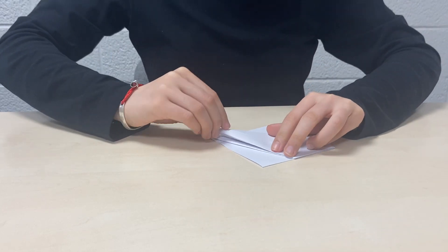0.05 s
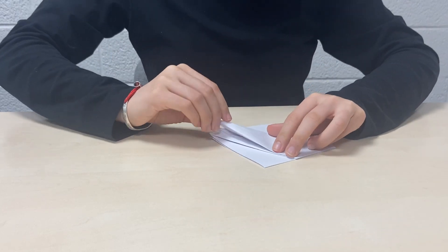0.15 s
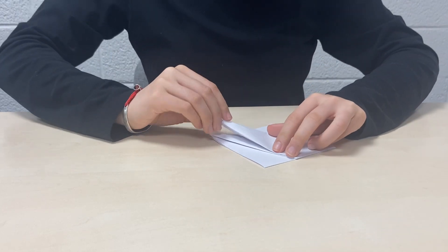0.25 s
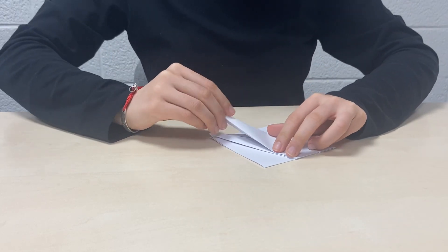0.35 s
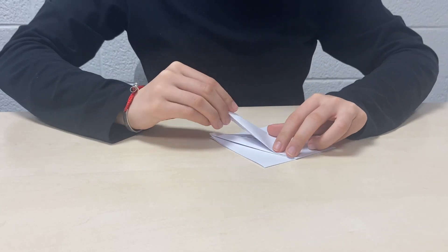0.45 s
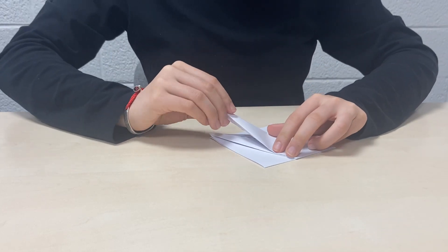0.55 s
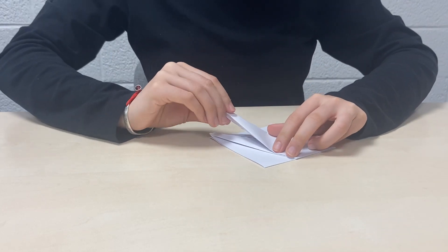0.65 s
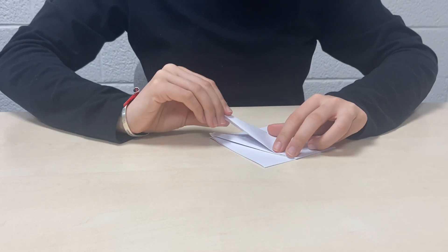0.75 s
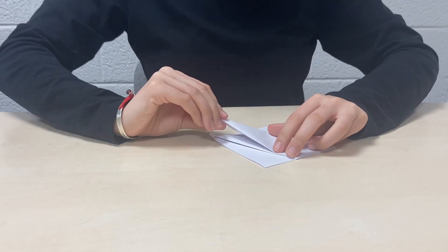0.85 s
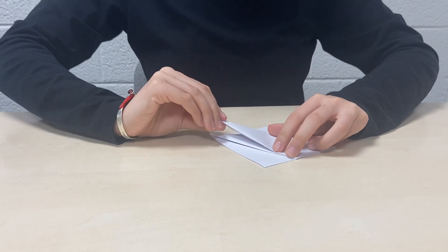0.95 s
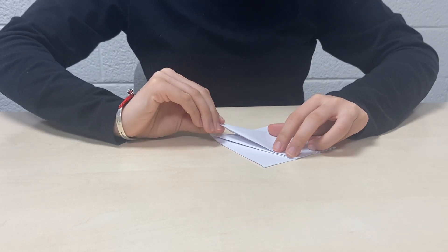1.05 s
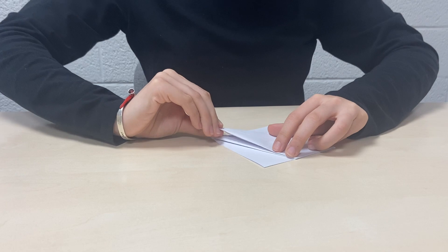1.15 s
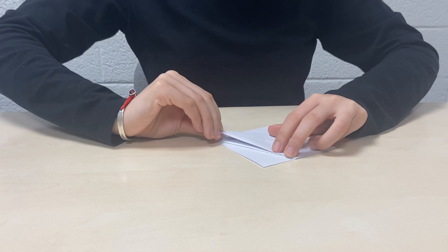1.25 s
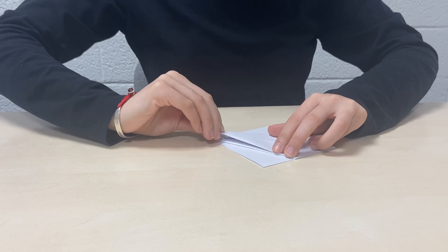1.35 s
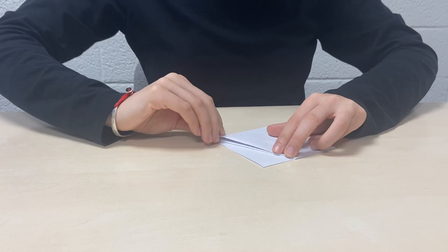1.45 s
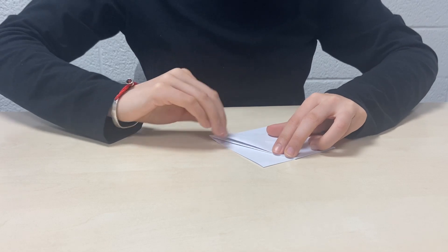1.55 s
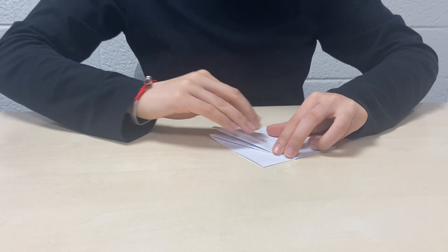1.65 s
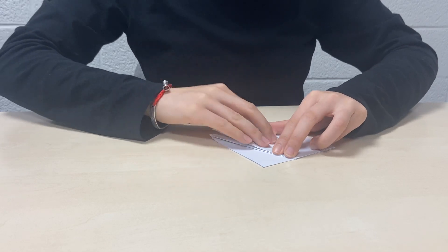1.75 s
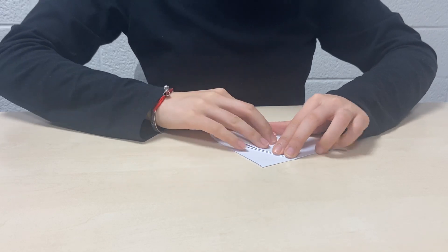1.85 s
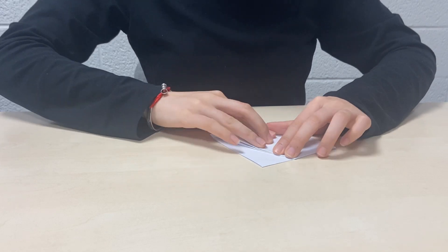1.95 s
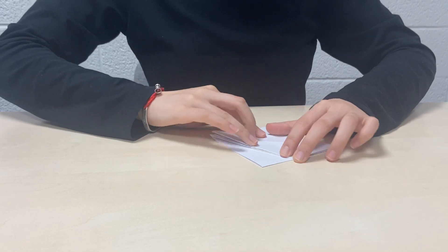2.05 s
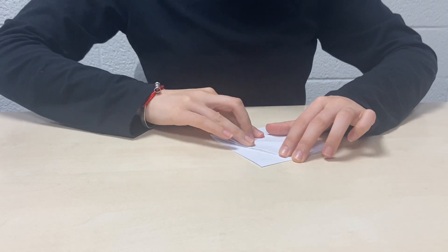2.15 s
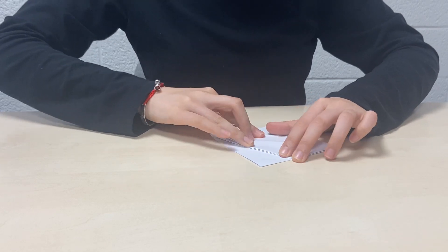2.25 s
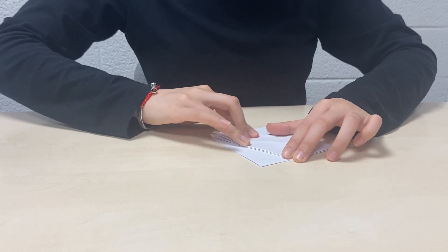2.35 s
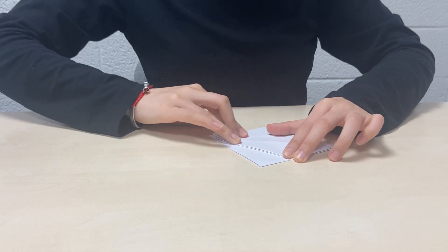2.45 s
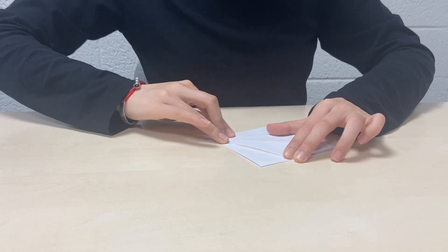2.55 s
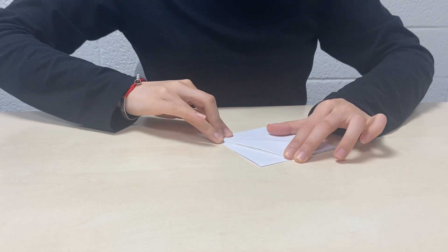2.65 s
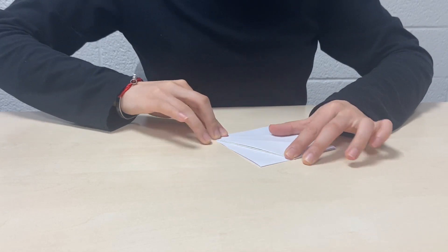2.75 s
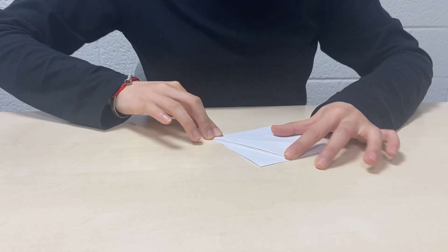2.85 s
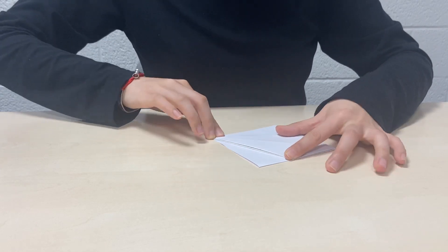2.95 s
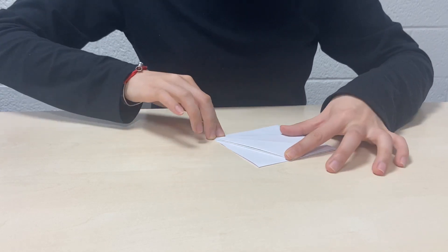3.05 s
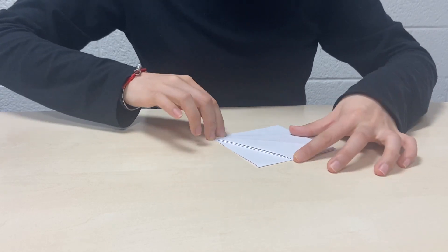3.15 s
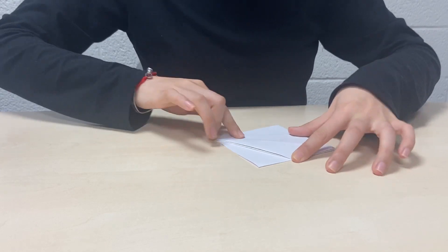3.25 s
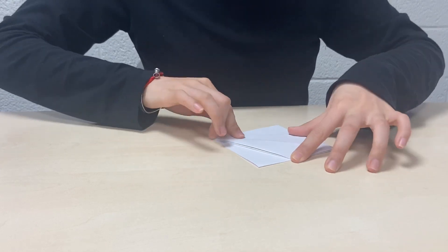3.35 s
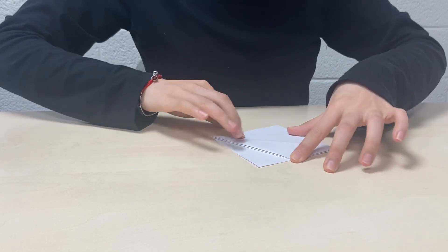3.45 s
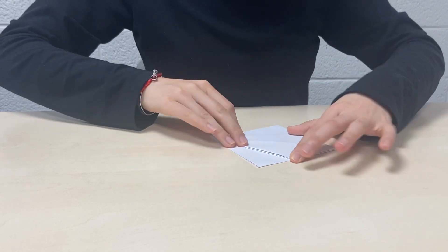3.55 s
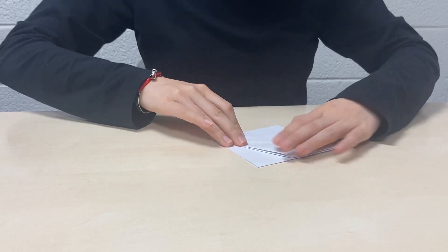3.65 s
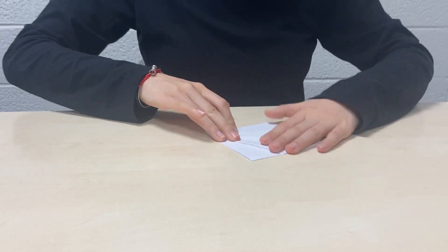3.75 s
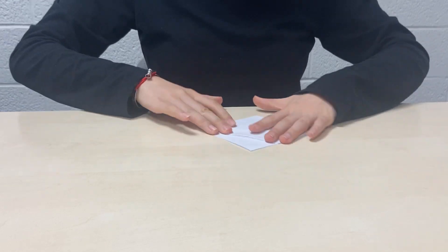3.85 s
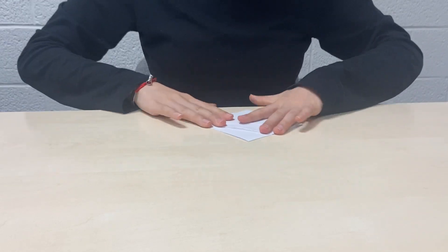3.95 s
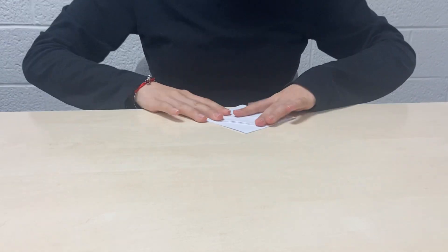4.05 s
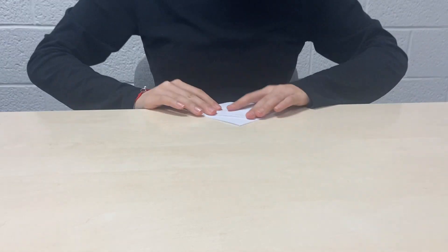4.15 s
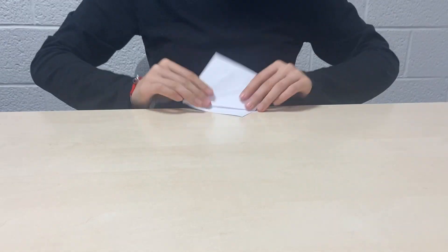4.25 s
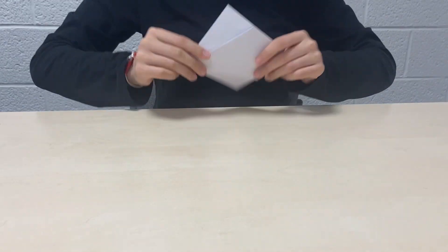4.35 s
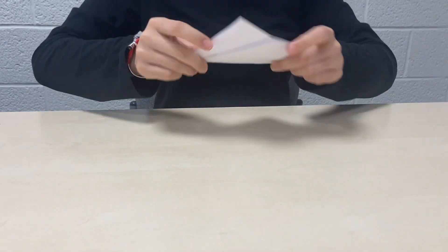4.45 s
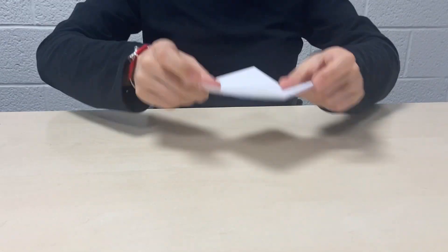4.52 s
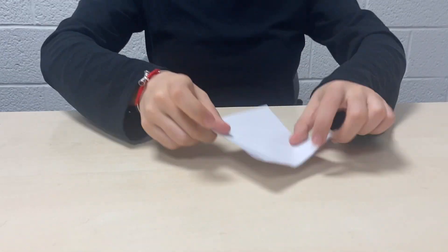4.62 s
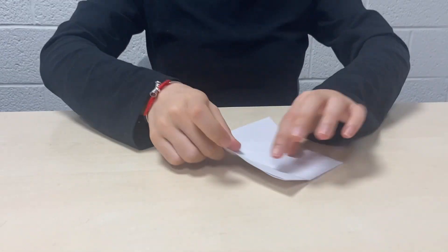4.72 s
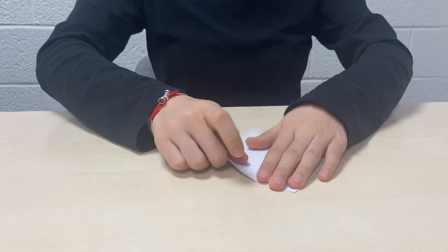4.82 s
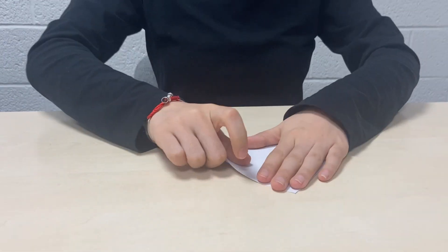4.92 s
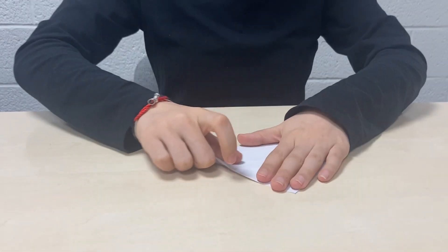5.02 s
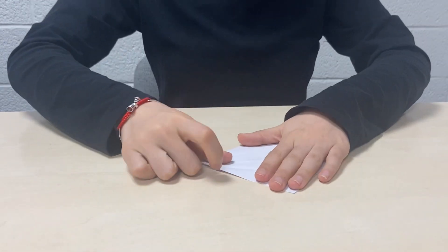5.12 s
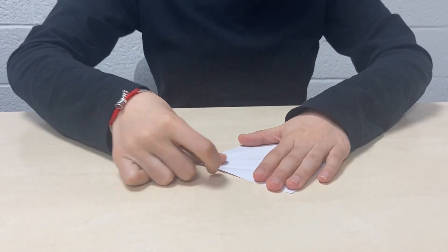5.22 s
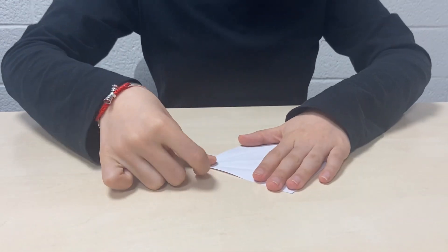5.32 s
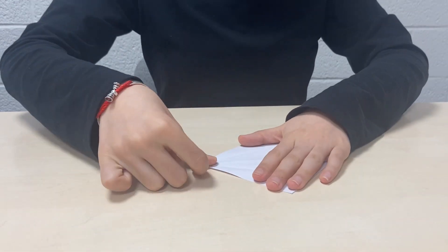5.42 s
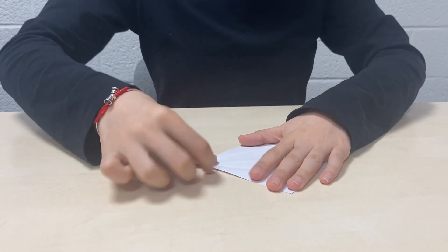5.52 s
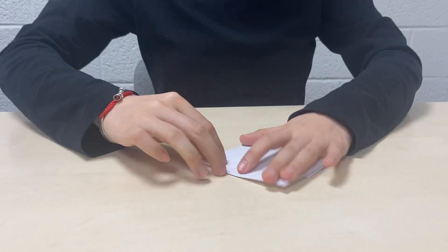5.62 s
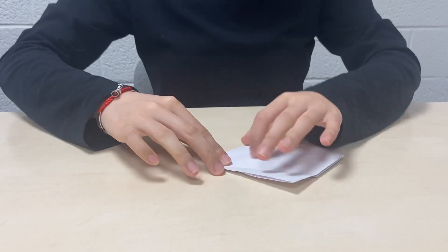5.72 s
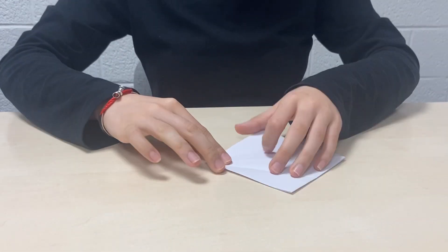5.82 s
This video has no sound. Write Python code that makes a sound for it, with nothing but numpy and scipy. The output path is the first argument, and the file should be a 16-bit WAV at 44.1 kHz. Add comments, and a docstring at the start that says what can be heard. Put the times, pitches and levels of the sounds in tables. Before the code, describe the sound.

Paper is folded by hand on a wooden table in a small bare room, heard close in stereo. A crisp tick opens the sound, another follows at 0.3 seconds, then lighter papery flicks at 0.8 and 1.3. Between 1.6 and 2.2 fingertips rub and press the crease with hissy strokes and tiny crackles. A tight cluster of snaps rings out at 2.4 to 2.5, then quieter scrapes and soft taps, with brief sharp rubs near 3.5. From 3.7 to 4.7 the sheet slides with a sustained papery hiss and is lifted, with a dull hand thud at 4.0 and fluttering crackles around 4.35. At 4.73 comes the loudest, brightest snap as it is turned over, followed by rustling and a wooden bump at 4.9. Rubbing continues, with crisp clicks at 5.14 and 5.7. Faint low ventilation rumbles throughout, and the snaps get a short room reflection.

```python
"""Paper handled on a wooden table

A folded sheet is creased, slid and turned over by hand in a small bare room, close to a two-port recorder.
Creases snap as noise bursts that ring; skin and paper are random grains through bands and resonances.
Wrists thud on the table as soft blows to its modes, the room answers the snaps with decaying noise,
and ventilation rumbles below as coloured noise."""
import sys
import numpy as np
from scipy import signal
from scipy.fft import rfft, irfft, next_fast_len
from scipy.io import wavfile

SR = 44100
rng = np.random.default_rng(int(sys.argv[2]) if len(sys.argv) > 2 else 0)


def wrap_up_sound(samples):
    """Save the sound to the file named by the first command line argument, as 16-bit audio."""
    columns = np.atleast_2d(samples).T
    # keep every value between -1 and 1, then stretch to whole-number steps
    tamed = np.clip(columns, -1, 1)
    steps = np.round(tamed * 32767).astype(np.int16)
    wavfile.write(sys.argv[1], SR, steps)


N = 259300   # length in samples

EDGES = 25 * 2 ** np.arange(0, 9.6, .5)   # half-octave band edges in Hz


def from_db(db):
    """Decibels to gain."""
    return 10 ** (np.asarray(db) / 20)


def rms_one(x):
    """Scale to rms 1."""
    return x / np.sqrt(np.mean(x ** 2) + 1e-20)


def in_time(rows):
    """Columns of a curve table, drawn as straight lines with one value a sample."""
    s, *columns = np.transpose(rows)
    return [np.interp(np.arange(N) / SR, s, column) for column in columns]


def at_hz(points, hz, order=1):
    """Read a column of a spectrum table on a log-frequency axis."""
    points = np.array(points)
    return np.interp(np.log(hz), np.log(points[:, 0]), points[:, order])


def drift(rate_hz):
    """Slow random curve of rms 1: noise through two equal low-pass poles at rate_hz."""
    step, settle = 40, 2000   # samples per coarse point, coarse points dropped while the filter settles
    r = np.exp(-2 * np.pi * step * rate_hz / SR)
    noise = rng.standard_normal(N // step + settle + 2)
    slow = signal.lfilter([1], [1, -2 * r, r * r], noise)[settle:]
    return np.interp(np.arange(N) / step, np.arange(len(slow)), rms_one(slow))


def band(x, low_hz, high_hz):
    """Band-pass."""
    return signal.sosfilt(signal.butter(2, [low_hz, high_hz], "band", fs=SR, output="sos"), x)


def resonance(x, hz, width_hz):
    """Two-pole resonance, gain 1 on top."""
    r = np.exp(-np.pi * width_hz / SR)
    poles = [1, -2 * r * np.cos(2 * np.pi * hz / SR), r * r]
    return signal.lfilter([(1 - r * r) / 2, 0, (r * r - 1) / 2], poles, x)


def stereo(mid, side, hz):
    """Blend two independent signals into a left and right that are as alike as that pitch calls for."""
    # Left-right likeness ahead of the recorder. Each row: frequency in Hz, correlation (1 = identical).
    likeness = [(60, 0.99), (120, 0.95), (250, 0.74), (500, 0.045), (900, 0.03), (1500, 0.05), (2500, 0.59),
                (5000, 0.26)]
    alike = np.clip(at_hz(likeness, hz), -1, 1)
    return np.sqrt(1 + alike) * mid + np.sqrt(1 - alike) * side * np.array([[1], [-1]])


def grains(per_s, spread_db):
    """Fibres catch and let go at random, a few much harder than the rest; mid and side rows."""
    sizes = from_db(spread_db * np.minimum(rng.exponential(1, (2, N)), 5))
    happens = rng.random(N) < per_s / SR
    return sizes * rng.standard_normal((2, N)) * happens + 1e-18


def coloured(source, spectrum, patchy_db, patchy_hz, thin_db=0, thin_hz=6360):
    """Half-octave bands of a source, each with its own level and flicker; rms 1.

    thin_db tilts the bands below thin_hz, in dB lost per octave."""
    out, together = 0, drift(patchy_hz)
    for k, (low, high) in enumerate(zip(EDGES, EDGES[1:])):
        hz = np.sqrt(low * high)
        if spectrum[0][0] <= hz * 1.3 and hz <= spectrum[-1][0] * 1.3:
            tilt_db = thin_db * min(np.log2(hz / thin_hz), 0)
            flicker_db = patchy_db * (together + 0.29 * drift(patchy_hz))
            gain = from_db(at_hz(spectrum, hz) + tilt_db + flicker_db)
            # neighbouring bands alternate in sign
            out = out + (-1) ** k * gain * stereo(*band(source, low, high), hz)
    return rms_one(out)


def resonant(source, modes, gains, wander_db=4):
    """A source through resonances that come and go as the fingers move; levelled by their summed power."""
    gains = [gain * from_db(wander_db * drift(12.4)) for gain in gains]
    out = 0
    for k, (gain, (hz, width_hz, _)) in enumerate(zip(gains, modes)):
        ringing = resonance(resonance(source, hz, width_hz), hz, width_hz)
        out = out + gain * (-1) ** k * rms_one(stereo(*ringing, hz))
    return out / np.sqrt(sum(gain ** 2 for gain in gains))


def ventilation(level_db=-61.5):
    """Air handling: steady noise, heavy in the lows, with a slight flicker."""
    # Colour of the rumble. Each row: frequency in Hz, relative level in dB per Hz.
    air_colour = [(15, -38), (25, -21), (76, 4.5), (130, -18.5), (149, 1.5), (270, -24), (363, -7),
                  (439, -32), (545, -56), (695, -91), (796, -33), (16000, -63.5)]
    noise = rng.standard_normal((2, N))
    return from_db(level_db) * coloured(noise, air_colour, patchy_db=0.3, patchy_hz=3.9)


def room(x, wall_s=0.0047, level_db=-8, size=22000):
    """A diffuse noise tail that swells up to the first walls and dies band by band."""
    # Decay of the bare room. Each row: frequency in Hz, time to fall 60 dB in seconds, relative level in dB.
    decay = [(200, 0.74, -6.5), (500, 0.33, 0.5), (1470, 0.23, -5), (3700, 0.22, 0), (10200, 0.11, -2.5)]
    t, tail = np.arange(size) / SR, 0
    for low, high in zip(EDGES[4::2], EDGES[6::2]):
        hz = np.sqrt(low * high)
        noise = stereo(*band(rng.standard_normal((2, size)), low, high), hz)
        tail = tail + noise * from_db(at_hz(decay, hz, order=2) - 60 * t / at_hz(decay, hz))
    tail = tail * np.clip(t / wall_s, 0, 1) ** 2
    tail = tail / np.sqrt(np.sum(tail ** 2) / 2)
    mono = x.mean(axis=0, keepdims=True)
    return from_db(level_db) * signal.fftconvolve(mono, tail, axes=1)[:, :N]


def table_top(landing_s=0.01, size=2600):
    """Soft blows and a steady jostle from the arms ring the modes of the table top."""
    # Hands and wrists landing. Each row: time in seconds, relative blow level in dB,
    # tilt towards the upper modes in dB per octave above 100 Hz.
    landings = [(0.165, -42, -3), (0.793, -46, -2), (0.948, -44, -9), (1.022, -46, -4), (1.781, -42, -5),
                (2.022, -44, -6), (2.414, -38.5, -6), (2.772, -43, -8), (3.339, -36, -13.5),
                (3.418, -41, -20), (3.637, -37, -14.5), (3.988, -25.5, -2.5), (4.281, -32.5, -3.5),
                (4.901, -24.5, 0), (5.311, -44, -5), (5.437, -47.5, -12), (5.548, -41, -6.5),
                (5.703, -31, -5)]
    # Arms leaning and shifting. Each row: time in seconds, relative jostle level in dB.
    leaning = [(0.0, -59.5), (1.44, -58.5), (1.75, -62.5), (1.9, -57.5), (3.27, -56.5), (3.52, -52.5),
               (3.95, -54.5), (4.16, -49.5), (4.68, -58), (5.06, -49), (5.31, -61.5), (5.58, -61.5),
               (5.88, -51.5)]
    # Modes of the wood. Each row: frequency in Hz, relative level in dB, time to fall 60 dB in seconds.
    wood_modes = [(57.4, -7.5, 0.79), (78.1, -4.5, 0.29), (112.6, -1.5, 0.38), (125.6, -2, 0.27),
                  (162.4, -4.5, 0.18), (207.6, -5, 0.19), (239.9, -11.5, 0.27), (290, -6, 0.14)]
    s, db, upper_db = np.transpose(landings)
    jostle = from_db(in_time(leaning)[0] - 35) * rng.standard_normal((2, N))
    t, out = np.arange(size) / SR, 0
    for hz, mode_db, t60 in wood_modes:
        blows = np.zeros((1, N))
        scatter_db = rng.normal(0, 2, len(s))   # no two blows excite a mode alike
        blow_db = db - 14.0 + upper_db * np.log2(hz / 100) + scatter_db
        blows[0, np.round(s * SR).astype(int)] = from_db(blow_db)
        # each landing is one short decaying push at the mode's pitch, with random phase
        phase = rng.uniform(0, 2 * np.pi, (2, 1))
        landing = np.exp(-t / landing_s) * np.sin(2 * np.pi * hz * t + phase)
        push = jostle + signal.fftconvolve(blows, 2 * landing / (landing_s * SR), axes=1)[:, :N]
        r, w = from_db(-60 / (t60 * SR)), 2 * np.pi * hz / SR
        poles = [1, -2 * r * np.cos(w), r * r]
        out = out + from_db(mode_db) * signal.lfilter([0, np.sin(w)], poles, stereo(*push, hz))
    # flesh makes a soft contact
    return signal.sosfilt(signal.butter(2, 330, fs=SR, output="sos"), out)


def handling(size=20, range_db=30, swell_bend=0.87, fade_bend=0.72):
    """Strokes swell and fade by one rule and add in power to the long slide; rustle power weights the curl.

    A stroke climbs range_db in its swell and drops as much in its fade; bends above 1 linger at the peak."""
    # Separate strokes of skin and paper. Each row: peak time, swell and fade in seconds, fingertip hiss,
    # sheet rustle and drag on the wood in dB, pitch that the curl of the sheet favours in Hz.
    strokes = [(0.0, .01, 0.14, -58, -62, -60, 2180), (0.037, 0.0027, 0.03, -41, -59.5, -56.5, 2350),
               (0.229, 0.84, 0.14, -57, -60, -67, 2850), (0.329, 0.0087, 0.034, -45, -46, -52, 2500),
               (0.354, .02, 0.4, -64, -61, -66, 2420), (0.58, 0.014, 0.13, -54.5, -63, -64, 2830),
               (0.639, 0.16, 0.04, -72, -68, -66.5, 2720), (0.779, 0.0068, 0.15, -64, -48.5, -47, 2130),
               (0.861, 0.04, 0.18, -91, -52.5, -57, 2180), (0.93, 0.11, 0.092, -67, -66, -56.5, 1770),
               (1.099, 0.19, 0.091, -88, -68.5, -65, 1860), (1.143, 0.0036, 0.98, -71.5, -93, -73, 1700),
               (1.269, 0.003, 0.19, -60, -51.5, -52, 2200), (1.35, 0.33, 0.22, -74, -76, -68, 1960),
               (1.393, .004, 0.11, -56, -67, -65, 1940), (1.44, 0.058, 0.18, -61, -80.5, -77, 2430),
               (1.59, 0.071, 0.016, -48, -59.5, -75, 2720), (1.625, 0.012, .04, -70, -59, -61, 1420),
               (1.65, 0.13, 0.063, -54, -65.5, -80, 2550), (1.765, 0.0062, 0.35, -52.5, -69.5, -87, 2800),
               (1.893, 0.057, 0.087, -44, -52, -61, 3930), (1.925, 0.035, 0.078, -54, -59, -58, 2900),
               (2.1, 0.11, 0.1, -53, -62, -59, 2900), (2.155, 0.25, 0.05, -57, -65, -70, 1900),
               (2.368, 0.0019, 0.086, -57.5, -66, -52.5, 2460),
               (2.406, 0.0024, 0.65, -54.5, -63, -54, 2400), (2.479, 0.01, 0.25, -54, -43, -69, 1950),
               (2.65, 0.96, 0.017, -69.5, -89, -76, 1670), (2.777, 0.0028, 0.34, -70.5, -62, -46, 1940),
               (2.858, 0.0072, 0.055, -75, -73, -47, 2000), (2.903, 0.0047, 0.27, -64.5, -83, -46.5, 1630),
               (3.06, 0.75, 0.15, -69.5, -110, -97, 3600), (3.17, 0.04, 0.28, -58.5, -68, -67, 2500),
               (3.244, 0.0026, 0.031, -49.5, -62, -70, 2560),
               (3.319, 0.0026, 0.06, -60.5, -61.5, -65, 2450), (3.472, 0.003, 0.082, -49, -75, -84, 2970),
               (3.498, 0.025, 0.063, -43.5, -65, -63, 3130), (3.722, 0.36, 0.069, -67.5, -71, -64, 2520),
               (4.29, 0.015, 0.3, -63, -73, -47.5, 2100), (4.73, 0.021, 0.13, -51, -58, -42.5, 2340),
               (4.752, .02, 0.38, -44.5, -51, -53, 2330), (4.9, 0.018, 0.2, -47, -50, -51, 2230),
               (5.05, 0.37, 0.48, -59, -93, -87, 2250), (5.143, 0.093, 0.038, -45.5, -58, -59, 2090),
               (5.302, 0.11, 0.2, -64, -71.5, -59, 1703), (5.344, 0.064, 0.086, -64, -59, -70, 650),
               (5.566, 0.0034, 0.49, -69, -77, -70, 2800), (5.601, 0.028, 0.041, -57, -75, -62.5, 685),
               (5.716, 0.18, 0.32, -52, -59, -60.5, 2170), (5.88, 0.084, 0.091, -59.5, -80, -68, 2650)]
    # The sheet is slid to the table edge and lifted. Each row: time in seconds, hiss, rustle and drag in dB,
    # curl pitch in Hz.
    slide_curve = [(3.7, -89, -91, -95, 1890), (3.75, -51, -62, -56.5, 1980),
                   (3.785, -53.5, -68, -60, 2430), (3.95, -48.5, -66, -74, 2570),
                   (4.18, -56, -68, -84, 2520), (4.3, -52.5, -65.5, -67, 2270),
                   (4.38, -59.5, -81, -64, 2010), (4.43, -50.5, -81, -63, 1910),
                   (4.52, -49.5, -66.5, -73, 1920), (4.564, -61.5, -68, -59, 1730),
                   (4.614, -52.5, -73, -74, 2290), (4.71, -50.5, -63, -78, 2290),
                   (4.74, -100, -100, -100, 2400)]
    t = np.arange(0, N + size, size) / SR   # coarse time grid
    s, swell, fade, *levels_db, curl_hz = np.array(strokes).T[:, :, None]
    before = (np.abs(s - t) / swell) ** swell_bend
    after = (np.abs(t - s) / fade) ** fade_bend
    away = np.where(t < s, before, after)
    power = from_db(-range_db * np.minimum(away, 5)) ** 2
    *slide_db, slide_hz = in_time(slide_curve)

    def summed(rows):
        """Sum of all strokes, one value a sample."""
        return np.interp(np.arange(N) / SR, t, rows.sum(axis=0))

    hiss, rustle, drag = [summed(power * from_db(2 * db)) + from_db(2 * slide)
                          for db, slide in zip(levels_db, slide_db)]
    stroke_curl = summed(power * from_db(2 * levels_db[1]) * curl_hz)
    curl = (stroke_curl + from_db(2 * slide_db[1]) * slide_hz) / rustle
    return np.sqrt(hiss), np.sqrt(rustle), np.sqrt(drag), curl


def fingertip_hiss():
    """Skin on the fibres: dense grains in flickering bands, with more or less body under the treble."""
    # Colour of the hiss. Each row: frequency in Hz, relative level in dB per Hz.
    hiss_colour = [(2000, -13.5), (3500, -1), (5000, -5), (7000, -2), (9000, 7), (12000, -6), (15500, -0.5)]
    # The hiss loses body off the wood and gains it when pressed down.
    # Each row: time in seconds, loss towards the lows in dB per octave (negative = more body).
    thinning = [(0, 0.5), (0.7, -7), (1.5, -1), (2.5, -4), (3.76, -1), (3.9, 1.5), (4.01, 0), (4.14, 0.5),
                (4.29, 0), (4.35, -4), (4.4, 5), (4.45, 20), (4.52, 10), (4.575, 6), (4.61, 7.5), (4.72, 8),
                (4.76, -4), (4.83, -2.5), (4.92, -4), (5.05, -5), (5.88, -4.5)]
    hiss = coloured(grains(20000, spread_db=0.9), hiss_colour, patchy_db=2.0, patchy_hz=13.0,
                    thin_db=in_time(thinning)[0])
    return signal.sosfilt(signal.cheby2(10, 40, 16100, fs=SR, output="sos"), hiss)


def sheet_rustle(curl_hz, favour_db=45):
    """The loose sheet's resonances ring to patchy catches; the curl changes their colour, not the level."""
    # Resonances of the sheet. Each row: frequency in Hz, width of each of two passes in Hz, relative dB.
    sheet_modes = [(676, 120, 4.5), (1017, 290, 10), (1340, 460, 13.5), (1613, 90, 4), (1782, 80, -2.5),
                   (1908, 70, -5), (2079, 59, -10.5), (2233, 86, -9), (2542, 99, -6), (3000, 800, -3),
                   (3640, 540, 0), (4530, 800, 4)]
    catches = grains(5000, spread_db=2.6) * from_db(1.5 * drift(25))
    weights = []
    for hz, _, db in sheet_modes:
        loss_db = np.minimum(favour_db * np.log2(hz / curl_hz) ** 2, 22)   # grows away from the curl pitch
        weights.append(from_db(db - loss_db))
    return resonant(catches, sheet_modes, weights)


def wood_drag(drag_gain, dulling=0.15, firm_db=-53):
    """Grains ring the resonances of the wood under the sheet; a drag lighter than firm_db is duller."""
    # Resonances of the wood. Each row: frequency in Hz, width of each of two passes in Hz, relative dB.
    drag_modes = [(209.4, 48, -2.5), (304, 93, -3), (376.3, 63, -1.5), (458.4, 81, -0.5), (606, 93, -0.5),
                  (703, 82, -9.5), (823.5, 86, -5), (1017, 140, -12.5)]
    # dulling is in dB per octave for every dB short of firm_db, up to 30 dB
    dull_db = dulling * np.clip(20 * np.log10(drag_gain) - firm_db, -30, 0)
    lowest_hz = drag_modes[0][0]
    weights = [from_db(db + dull_db * np.log2(hz / lowest_hz)) for hz, _, db in drag_modes]
    return resonant(grains(6000, spread_db=1.5), drag_modes, weights)


def rubbing():
    """Fingertip hiss, sheet rustle and drag on the wood follow the gestures of the hands."""
    hiss_gain, rustle_gain, drag_gain, curl_hz = handling()
    hiss = hiss_gain * fingertip_hiss()
    rustle = rustle_gain * sheet_rustle(curl_hz)
    return hiss + rustle + drag_gain * wood_drag(drag_gain)


def snaps(crack_s=0.0012, flap_s=0.0015, kick=2.35, pop_s=0.0043, rise_s=0.00012, sharpness=3.9,
          apart=0.48, left_db=1.14, size=1500):
    """A bright crack, then the freed flap shudders and rings at its pitch, and pushes out a low pop."""
    # Creases and edges letting go. Each row: time in seconds, flap ring level in dB, flap pitch in Hz,
    # crack level in dB, low pop level in dB (levels are mid peaks of each part).
    creases = [(0.037, -41.5, 1680, -27.5, -45), (0.065, -54, 1500, -57, -58),
               (0.3281, -38.5, 1400, -29.5, -38.5), (0.4382, -55.5, 2750, -46, -75),
               (0.503, -73, 980, -55, -55.5), (0.574, -69, 2850, -54, -56), (0.7761, -39.5, 2110, -57, -54),
               (0.783, -43.5, 2370, -68, -49), (1.05, -71, 1610, -58, -92), (1.1463, -58, 1300, -56, -64),
               (1.2174, -77, 904, -52.5, -62), (1.2703, -39.5, 2340, -63, -52),
               (1.579, -55, 3430, -46, -72), (1.5916, -44, 2610, -41, -52.5),
               (1.703, -80, 1210, -56, -57.5), (1.765, -66, 3740, -51, -79), (1.7952, -57, 3020, -60, -56),
               (1.803, -57, 3500, -44, -52), (1.827, -50, 3900, -62.5, -56),
               (1.8385, -49, 2230, -37.5, -46.5), (1.863, -59, 3620, -49, -59),
               (1.8997, -45, 1810, -38.5, -66), (1.912, -49, 1340, -60, -52), (2.058, -52, 3580, -58, -78),
               (2.075, -57, 1570, -52, -51), (2.178, -70, 4100, -45, -82), (2.364, -86, 1600, -72, -75),
               (2.4065, -70.5, 2880, -30, -41), (2.4269, -51, 3000, -37, -43),
               (2.4792, -32, 2620, -43.5, -41), (2.4837, -37, 1310, -60, -43),
               (2.4892, -40, 2850, -40, -46), (2.4951, -42, 1750, -65, -31.5),
               (2.5001, -36.5, 2560, -63, -58), (2.7385, -61, 900, -50, -59), (2.7728, -60, 1000, -58, -51),
               (2.8102, -72, 1040, -54, -49.5), (2.8568, -56, 860, -50, -49), (2.9051, -56, 834, -51, -54),
               (2.9134, -58.5, 1910, -60, -50), (3.162, -56, 595, -75, -56), (3.242, -66, 2570, -58, -94),
               (3.3199, -67.5, 1900, -45.5, -55.5), (3.472, -52, 2900, -63, -66),
               (3.494, -76, 4500, -32.5, -77), (3.564, -61, 2320, -59, -78),
               (3.5992, -62.5, 2970, -39.5, -63), (3.616, -74, 3000, -43, -64),
               (3.693, -60, 2780, -48, -61), (3.7443, -52, 2600, -54, -50), (3.7513, -50, 1160, -50, -42.5),
               (3.754, -62, 1980, -46, -51), (3.766, -52, 1400, -52, -49), (3.7746, -43, 1220, -42, -47.5),
               (3.7773, -38.5, 1580, -37, -45.5), (3.8549, -53, 3150, -44, -73), (4.2, -55, 2670, -45, -61),
               (4.3114, -49, 810, -62, -52.5), (4.281, -65, 910, -56, -53), (4.3201, -51, 1040, -63, -50),
               (4.335, -48, 970, -56, -47), (4.3428, -46, 2000, -50, -45), (4.356, -49, 1760, -51, -52.5),
               (4.3625, -56, 800, -61, -45), (4.374, -60, 1250, -56, -65),
               (4.4036, -50.5, 1720, -69, -44.5), (4.4142, -51, 2180, -62.5, -53),
               (4.4337, -41, 1890, -59, -45.5), (4.536, -69, 910, -62, -54.5),
               (4.5502, -58, 1800, -52, -69), (4.562, -63, 890, -73, -53), (4.7193, -49.5, 3260, -38, -62),
               (4.7266, -39, 2200, -14, -34), (4.7284, -29, 4700, -25.5, -35.5),
               (4.89, -54, 2500, -35, -59), (4.9045, -37, 2010, -25.5, -43),
               (5.1351, -54.5, 2130, -25.5, -65), (5.137, -61, 566, -43, -48), (5.163, -74, 1225, -58, -49),
               (5.5742, -68, 3960, -59.5, -63), (5.652, -68, 3530, -49, -73), (5.695, -56, 1490, -44, -52),
               (5.707, -48, 1420, -21.5, -45), (5.858, -59.5, 3500, -46, -55), (5.87, -61, 1080, -50, -57)]
    shudder_lift_db, shudder_follows = 5, 0.38   # unpitched shudder over the ring, share of the crack's lead
    out, t = np.zeros((2, N + size)), np.arange(size) / SR
    chance = rng.standard_normal((len(creases), 3, 2, size))
    chance[:, :, 0, 3:6] += kick   # the crease gives way at one stroke
    chance[:, :, 1] *= apart       # each port sees the flap from its own side
    rise = 1 - np.exp(-t / rise_s)
    for (s, db, hz, crack_db, pop_db), (a, b, c) in zip(creases, chance):
        crack = band(a * rise * np.exp(-t / crack_s), 4500, 21800)
        flap = b * rise * np.exp(-t / flap_s)
        ringing = resonance(resonance(flap, hz, hz / sharpness), hz, hz / sharpness)
        shudder = band(flap, 1160, 3660)
        pop = band(c * rise * np.exp(-t / pop_s), 300, 1340)
        shudder_db = db + shudder_lift_db + shudder_follows * (crack_db - db)
        parts = (crack_db, crack), (db, ringing), (shudder_db, shudder), (pop_db, pop)
        mid, side = sum(from_db(level) * part / np.abs(part[0]).max() for level, part in parts)
        at = round(s * SR)
        out[:, at:at + size] += [mid + side, mid - side]
    return out[:, :N] * from_db([[left_db], [-left_db]])


def scene():
    """Paper and table close by, the room's answer to the snaps and the ventilation behind."""
    paper = snaps()
    return ventilation() + room(paper) + table_top() + rubbing() + paper


def record(dry):
    """Two ports: treble nearly shared, its phase turning between them; left a little louder; ends cut."""
    shared_hz, turn_hz = 6870, 4300   # above the first, left falls a cycle behind every turn_hz
    dwell, lead = .5, .6              # lingering in and out of phase; most radians by which left leads lower down
    size = next_fast_len(N)
    hz = np.arange(size // 2 + 1) * SR / size
    left, right = rfft(dry, size)
    apart = np.clip((shared_hz - hz) / 1100, .2, 1)   # side signal narrows towards the treble
    mid, side = (left + right) / 2, (left - right) / 2 * apart
    behind = 2 * np.pi * np.maximum(hz - shared_hz, 0) / turn_hz
    behind = behind - dwell * np.sin(2 * behind) / 2 - lead * apart * np.minimum(hz / 1500, 1)
    turn = np.exp(.5j * behind)   # half the phase goes to each port
    ports = irfft(np.array([(mid + side) / turn, (mid - side) * turn]), size)[:, :N]
    ports = ports * from_db([[.2], [-.2]])
    ports = signal.sosfilt(signal.butter(2, 32, "high", fs=SR, output="sos"), ports)
    return signal.sosfilt(signal.cheby2(16, 70, 16700, fs=SR, output="sos"), ports)


dry = scene()
out = record(dry)
wrap_up_sound(out)
```